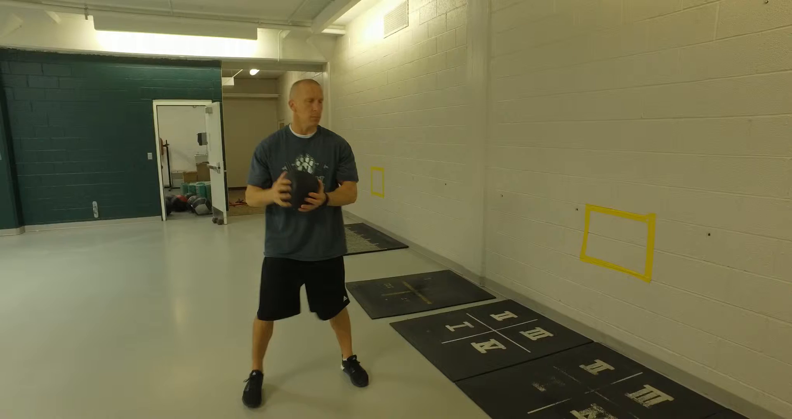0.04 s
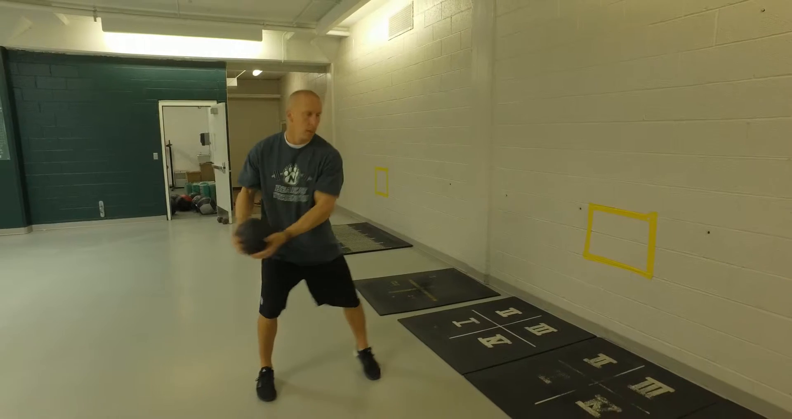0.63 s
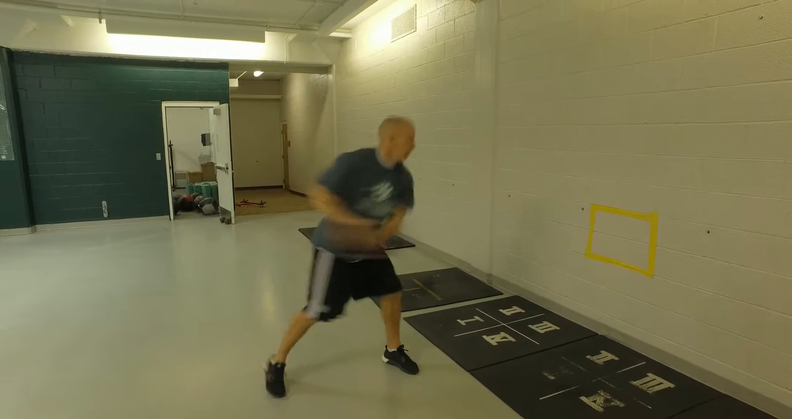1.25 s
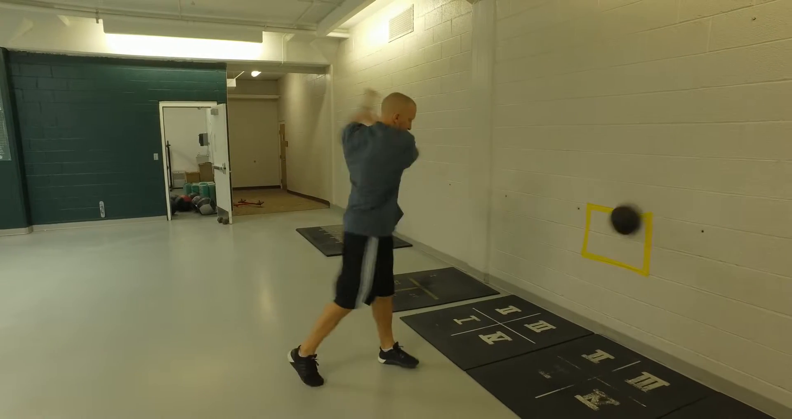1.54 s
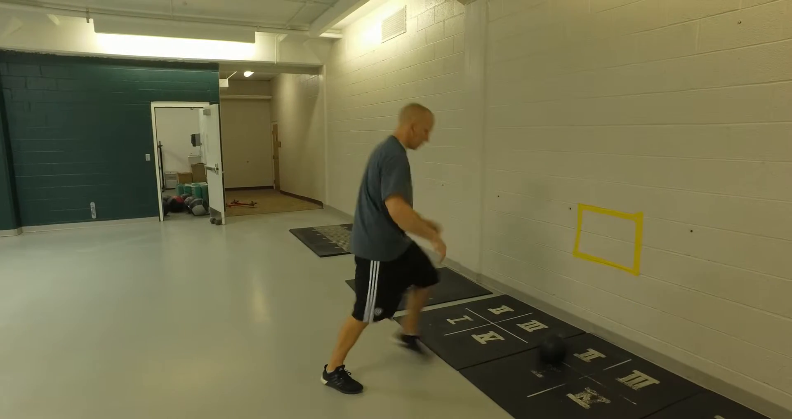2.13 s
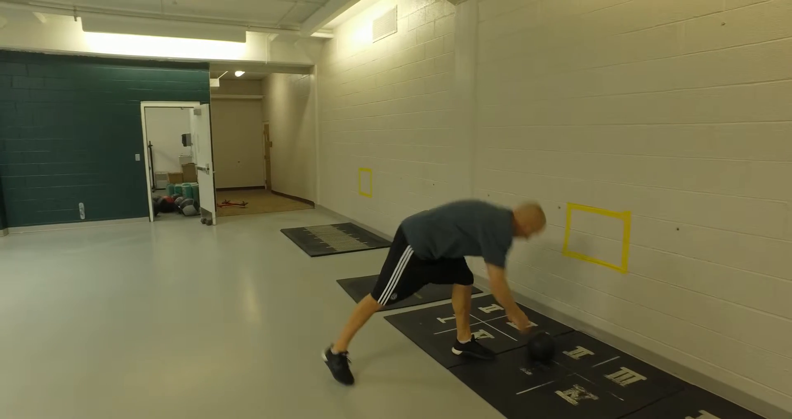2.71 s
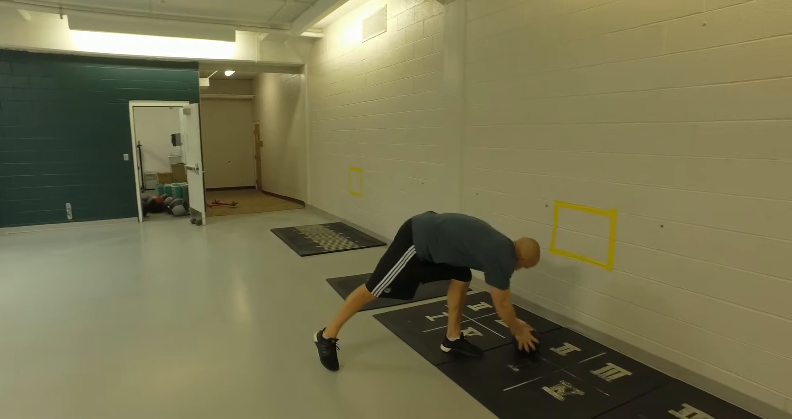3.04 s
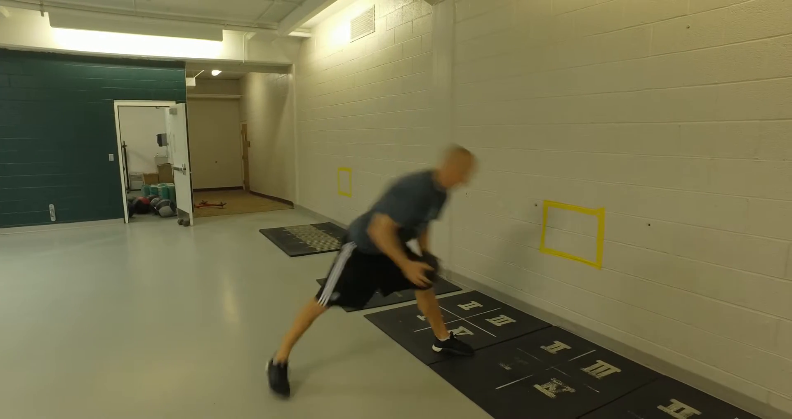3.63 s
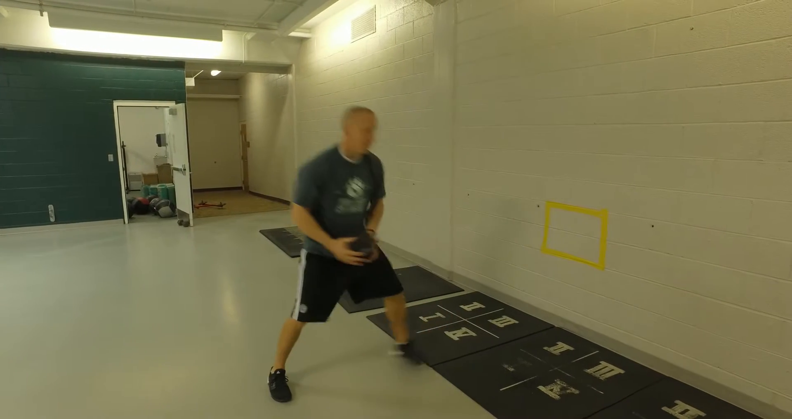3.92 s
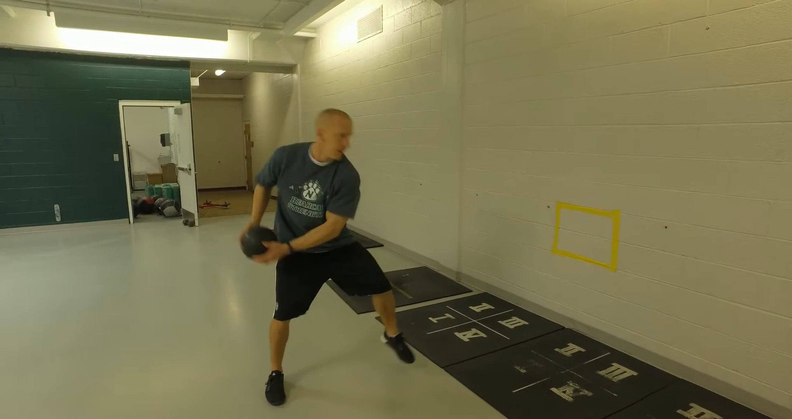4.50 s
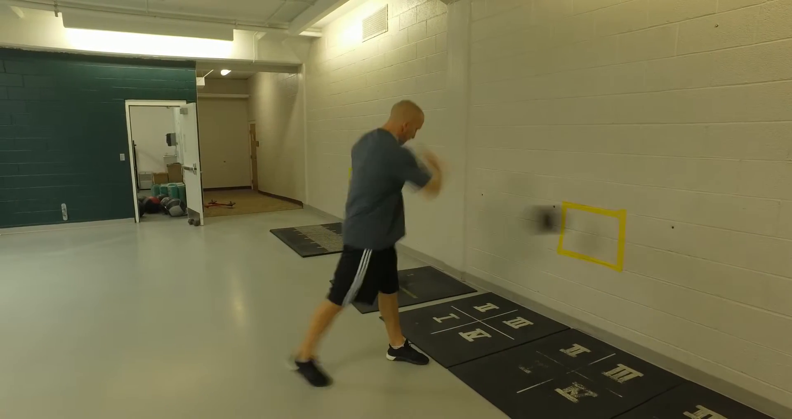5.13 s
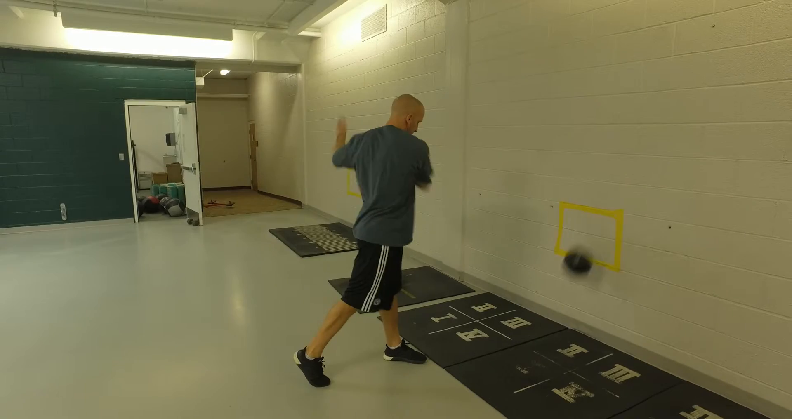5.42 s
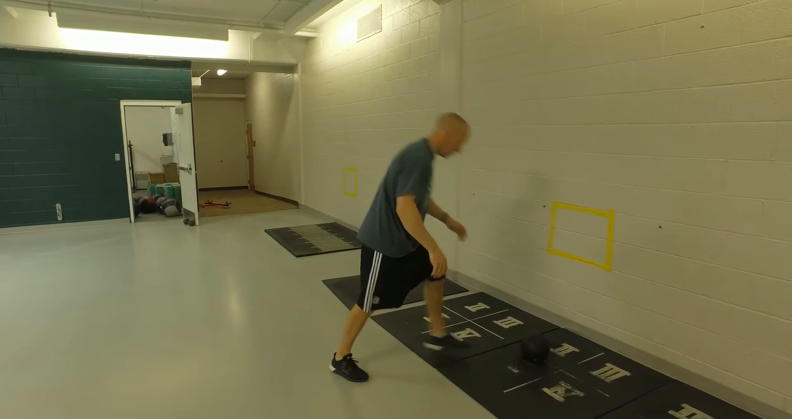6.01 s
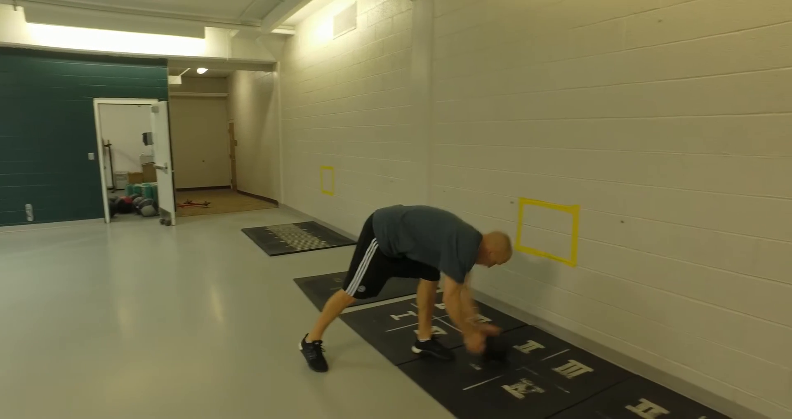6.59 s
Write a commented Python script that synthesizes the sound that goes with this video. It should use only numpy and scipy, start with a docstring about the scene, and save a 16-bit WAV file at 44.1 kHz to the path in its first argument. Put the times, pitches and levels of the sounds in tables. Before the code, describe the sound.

The microphone comes on with a tick, a dull bump and a very short, loud spit of static just before 0.2 seconds. Ventilation then hisses and hums steadily in a long, hard training room. At about 1.4 seconds a quick swish of arms leads into a medicine ball hitting a block wall: a slap and a heavy thud that crackles as it overloads the microphone and booms on for seconds. The ball knocks onto a floor mat at 1.8 seconds. Soft, low footfalls come near 2.2, 2.7 and 3.7 seconds, and rubber soles step and drag briefly around 4.2 to 4.4 seconds. Another swish brings a second, slightly softer wall slap and deep thud at 5.1 seconds, followed by a firm drop onto the mat at 5.5. Under the fading boom come a step at 6 seconds and a soft thump with a light slap near 6.6.

```python
"""A long, hard training room: a medicine ball is thrown twice at a block wall and drops onto a floor mat.
Each throw is a swish of the arms, a slap of the ball's skin and a heavy thud that booms on in the room.
Shoes shift on the floor, and the ventilation hisses and hums steadily.
The microphone comes on with a bump and a spit of static, and the hardest blow overloads it."""
import sys
import numpy as np
from scipy import signal
from scipy.fft import rfft, irfft, next_fast_len
from scipy.io import wavfile

SR = 44100
rng = np.random.default_rng(int(sys.argv[2]) if len(sys.argv) > 2 else 0)


def digitize_waveform(pressure):
    """Quantize a signal to 16-bit integers and store it at the path in sys.argv[1].

    Rows of a 2-D input are taken as channels; values are limited to [-1, 1].
    """
    field = np.atleast_2d(pressure).T
    bounded = np.clip(field, -1, 1)
    quanta = np.round(bounded * 32767).astype(np.int16)
    wavfile.write(sys.argv[1], SR, quanta)


N = 297675
TIME = np.arange(N) / SR
OPEN_S = .1699  # the microphone starts to pass the room's sound

# standing waves that every thud sets going: (frequency [Hz], level [dB], t60 [s])
ROOM_MODES = [(21.4, -8.5, 2.05), (35.96, -10.5, 2.6), (74.5, -18, 4.2), (123.7, -26, 1.9),
              (132.5, -10, 3.5), (160.5, -20.5, 3.9), (174.6, -20.5, 6.4), (196.5, -20.5, 4.3),
              (259.7, -19, 2.3), (477, -38, 0.44)]


def wall_thuds():
    """The ball flattens and rings dead; the wall drives the room's boom and its standing waves."""
    # ball on wall: (time [s], level [dB], rumble boost [dB], boom boost [dB])
    hits = [(1.4032, -1.5, -2, 2), (5.106, -5, 1.5, -2.5)]
    # the ball's dead ring: (frequency [Hz], level [dB], t60 [s])
    ball_modes = [(68, -46, .09), (171, 0, 0.085), (315.5, -2, 0.12), (538, -1.5, 0.033)]
    # colour of the thud: (frequency [Hz], level [dB])
    colour = [(18, 1.5), (30, 2), (44, -8.5), (62, -2.5), (88, -5.5), (135, -0.5), (200, -9.5), (280, -14),
              (420, -22), (650, -26.5), (1000, -42.5), (1400, -72.5), (3000, -55)]
    out, ball, standing = np.zeros(N), ring(ball_modes), ring(ROOM_MODES)
    for s, thud_db, _, boom_db in hits:
        out += from_db(thud_db) * later(s, from_db(boom_db) * ball + from_db(boom_db / 2) * standing)
    for hz, band in noise_bands(colour):
        envelope = in_room(hz, near_db=-1, near_t60=0.36, rise=0.012)
        deep = 1 / (1 + (hz / 70) ** 2)  # the rumble sits below 70 Hz
        hollow = np.exp(-(np.log2(hz / 170) / 0.88) ** 2)  # the boom centres on 170 Hz
        for s, thud_db, rumble_db, boom_db in hits:
            band_db = thud_db + rumble_db * deep + boom_db * hollow - 4.5
            out += from_db(band_db) * band * later(s, envelope)
    return out


def floor_thuds():
    """Ball and shoes land soft and heavy: a short punch, then the room's boom with less rumble."""
    # landings: (time [s], level [dB], punch re level [dB])
    landings = [(1.834, -16.5, -17.5), (2.21, -26, -13), (2.701, -27.5, 4), (3.66, -29, -11),
                (4.158, -35, 5), (4.328, -27.5, -5), (5.524, -13, 5.5), (6.02, -29.5, 7),
                (6.582, -28.5, -3)]
    # dead knock of a weight on the floor: (frequency [Hz], level [dB], t60 [s])
    floor_modes = [(121.7, 3, 0.2), (205, 5, 0.12), (299, -8, 0.045), (393, -4.5, 0.096), (577, -24, 0.094)]
    # colour of the thud: (frequency [Hz], level [dB])
    colour = [(18, -41), (50, -8), (85, -2), (135, -3.5), (200, -8), (330, -10), (550, -15.5), (900, -32),
              (1500, -53), (3000, -70)]
    out, punch, standing = np.zeros(N), ring(floor_modes), ring(ROOM_MODES)
    for s, thud_db, punch_db in landings:
        out += from_db(thud_db) * later(s, from_db(punch_db) * punch + from_db(2.5) * standing)
    for hz, band in noise_bands(colour, count=9):
        envelope = in_room(hz, near_db=3.5, near_t60=0.13, rise=0.024)
        out += band * sum(from_db(thud_db - 7) * later(s, envelope) for s, thud_db, _ in landings)
    return out


def slaps():
    """The ball's skin cracks on wall, mat and hands, then rings; the room answers with a bright tail."""
    # slaps: (time [s], level [dB], tilt [dB/octave], crack re level [dB], skin ring re level [dB])
    contacts = [(1.233, -61, 6.5, 12, -20), (1.4053, -27, -1, 10, -8.5), (1.4164, -38, 5.5, 6, -19),
                (1.814, -35.5, -1, 20, -11.5), (3.4145, -67, 2, 12, -12), (5.1061, -32, -2.5, 21.5, -6),
                (5.12, -38.5, 6, 0, 1), (5.18, -47, 1, 21, -24), (5.503, -41.5, 1, 22.5, -8),
                (6.5899, -47.5, -3, 6, -9)]
    # colour of the slap: (frequency [Hz], level [dB])
    colour = [(200, 10.5), (600, 1.5), (1050, 7.5), (1450, -6.5), (2350, -1), (3200, -9.5), (4000, -16),
              (5100, -20), (6000, -5), (7800, -6), (9500, -12), (11000, -4.5), (15000, -17)]
    # the taut skin's resonances: (frequency [Hz], level [dB])
    skin_colour = [(1500, -51), (2100, -8), (2400, -8), (2900, -21), (3600, -26), (5300, -28), (6050, -20),
                   (6900, -43), (8500, -50)]
    out, crack = np.zeros(N), dying(0.041, rise=0.0012)
    for hz, band in noise_bands(colour, count=10):
        tail = in_room(hz, near_db=-0.5, near_t60=0.18, rise=0.022)
        octaves = np.log2(max(hz, 500) / 3000)  # the tilt pivots on 3 kHz
        for s, db, tilt, crack_db, _ in contacts:
            out += from_db(db + tilt * octaves) * band * later(s, from_db(crack_db) * crack + tail)
    skin = noise(skin_colour)
    skin_tail = in_room(2070, near_db=19.0, near_t60=0.038, rise=0.043)
    for s, db, _, _, ring_db in contacts:
        out += from_db(db + ring_db) * skin * later(s, skin_tail)
    return out


def swishes():
    """Cloth and air rush past as the arms throw, just before the ball lands."""
    # throws: (time [s], half width [s], level [dB])
    throws = [(1.35, 0.1, -31), (5.06, 0.14, -32.5)]
    # colour of the swish: (frequency [Hz], level [dB])
    colour = [(25, 2), (70, 3), (150, 7), (400, -8), (900, -5), (1500, -20), (2300, -25), (4000, -45),
              (12000, -70)]
    return noise(colour) * swells(throws)


def shuffles():
    """A rubber sole drags briefly over the floor as the feet are set."""
    # slides and pivots: (time [s], half width [s], level [dB])
    slides = [(1.25, 0.059, -38), (4.19, 0.096, -28.5), (4.37, 0.11, -29.5)]
    # colour of the sliding sole: (frequency [Hz], level [dB])
    colour = [(35, -12), (80, 3), (150, -12), (260, -8), (370, -2), (520, -9), (900, -13), (1400, -30),
              (3000, -40), (12000, -75)]
    return noise(colour) * swells(slides)


def switch_on():
    """The microphone comes on with a tick, a short dull bump and a loud spit of static."""
    # colour of the bump: (frequency [Hz], level [dB])
    bump_colour = [(30, 11), (150, -0.5), (260, -2), (430, -6), (620, -17), (900, -21), (1400, -14),
                   (2200, -22), (3200, -34), (4800, -33), (7000, -30), (12000, -53)]
    # the bump's ring: (frequency [Hz], level [dB], t60 [s])
    bump_modes = [(130, -13, 0.014), (445, -14.5, 0.17), (802, -24, 0.54)]
    # colour of the static: (frequency [Hz], level [dB])
    static_colour = [(100, -3), (850, -11), (1050, 10.5), (1300, 9), (1800, -26), (2200, 8), (2700, -24),
                     (3400, -4.5), (6500, -8), (8200, 6.5), (9300, -14), (10100, 9), (11000, -8),
                     (15000, -6)]
    tick_s, bump_s, static_s = .1272, .1335, .1667
    tick = from_db(-11.5) * later(tick_s, dying(0.005, rise=.00005))
    bump = from_db(-15) * noise(bump_colour) * later(bump_s, dying(0.48, rise=0.00087))
    bump += later(bump_s, ring(bump_modes))
    static = from_db(-2) * noise(static_colour) * (TIME > static_s)
    return tick + (bump + static) * (TIME < OPEN_S)


def overload(x):
    """Peaks clip flat; two crests placed on the hardest blow flip to the opposite rail and crack."""
    # cracks: (time [s], flip length [s], crest height [x full scale])
    cracks = [(1.4095, .00045, -2), (1.4297, .00025, 2)]
    polarity = np.ones(N)
    for s, length, peak in cracks:
        crest = np.exp(-((TIME - s) / 0.0016) ** 2)
        x = (1 - crest) * x + crest * peak
        polarity[(TIME >= s) & (TIME < s + length)] = -1
    return np.clip(x, -1, 1) * polarity


def ventilation():
    """Moving air lays a steady bed of rush and hiss over a three-tone hum."""
    # low rush of air: (frequency [Hz], level [dB])
    rush = [(20, -16), (50, -2), (100, -5), (200, 0.5), (380, -2.5), (560, -4.5), (750, -11.5),
            (1050, -12.5), (1400, -27), (2100, -18), (2600, -24), (3200, -52), (6000, -36), (15000, -42)]
    # mid hiss: (frequency [Hz], level [dB])
    mid_hiss = [(1200, -30), (1500, -7), (1900, -2), (2500, -4), (3200, -13.5), (5000, -33)]
    # high hiss: (frequency [Hz], level [dB])
    high_hiss = [(2500, -43), (3200, -8), (3800, 10), (4300, 9), (5100, -12), (5900, 3), (7000, -32),
                 (15000, -21)]
    # hum: (frequency [Hz], level [dB])
    tones = [(118.4, -38.5), (209.9, -45), (360.7, -45)]
    flow = from_db(-34.5) * noise(rush) + from_db(-51) * noise(mid_hiss)
    flow += from_db(-53) * noise(high_hiss)
    hum = sum(from_db(db) * np.sin(2 * np.pi * (hz * TIME + rng.random())) for hz, db in tones)
    return flow + np.sqrt(2) * hum


def mic_noise():
    """The microphone's own hiss creeps up after switch-on, then holds."""
    # colour of the hiss: (frequency [Hz], level [dB])
    colour = [(2000, 6.5), (4200, 1), (5100, -62), (6000, 3.5), (8000, 3.5), (10500, 3), (12200, 0.5),
              (14500, 3.5)]
    creep_db, settle_s = 5, 1.5
    unsettled = np.maximum(1 - TIME / settle_s, 0)
    return from_db(-49 - creep_db * unsettled) * noise(colour)


def in_room(hz, near_db, near_t60, rise):
    """A blow's envelope in one band: strong, brief near reflections, then the long diffuse tail."""
    # the room's decay: (frequency [Hz], t60 [s])
    room_t60 = [(25, 5.4), (70, 3.45), (140, 3.83), (300, 3.75), (600, 2.38), (1200, 3.3), (2400, 0.75),
                (6500, 0.81), (13000, 0.25)]
    return from_db(near_db) * dying(near_t60) + dying(at_hz(room_t60, hz), rise)


def dying(t60, rise=0.00092):
    """Envelope that opens with time constant rise [s] and falls 60 dB in t60 [s]."""
    age = TIME[:int(1.5 * t60 * SR)]
    attack = -np.expm1(-age / rise)
    decay = np.exp(-np.log(1000) * age / t60)
    return np.pad(attack * decay, (0, N - len(age)))


def swells(events):
    """Envelope with one bell-shaped swell for each event."""
    return sum(from_db(db) * np.exp(-((TIME - s) / width) ** 2) for s, width, db in events)


def ring(modes):
    """Damped modes after one blow."""
    return sum(from_db(db) * dying(t60) * np.sin(2 * np.pi * hz * TIME) for hz, db, t60 in modes)


def noise_spectrum(colour):
    """Random spectrum shaped by a colour, with nothing below hearing; returns (Hz, bins)."""
    size = next_fast_len(N)
    hz = np.arange(size // 2 + 1) * SR / size
    gain = from_db(at_hz(colour, hz)) * (hz > 16)
    gain /= np.sqrt(np.mean(gain ** 2) + 1e-20)  # a colour sets tone only, not loudness
    return hz, rfft(rng.standard_normal(size)) * gain


def noise(colour):
    """Steady coloured noise of unit rms."""
    return irfft(noise_spectrum(colour)[1], next_fast_len(N))[:N]


def noise_bands(colour, count=14):
    """Coloured noise split into log-spaced (centre Hz, band) pairs."""
    hz, bins = noise_spectrum(colour)
    edges = np.geomspace(16, 18000, count + 1)
    return [(np.sqrt(lo * hi), irfft(bins * (hz >= lo) * (hz < hi), next_fast_len(N))[:N])
            for lo, hi in zip(edges, edges[1:])]


def at_hz(points, hz):
    """Read a table on a log-frequency axis."""
    knots, values = np.transpose(points)
    return np.interp(np.log(np.maximum(hz, 1)), np.log(knots), values)


def later(s, sound):
    """Delay a sound by s seconds."""
    start = int(s * SR)
    return np.concatenate([np.zeros(start), sound[:N - start]])


def from_db(db):
    """Decibels to gain."""
    return 10 ** (np.asarray(db) / 20)


def scene():
    """The mono mix; near echoes give everything but the thuds a hollow ripple."""
    # early echoes off side wall and ceiling: (delay [s], level [dB])
    near_echoes = [(0.0187, -17.5), (0.0293, -15)]
    bright = slaps() + swishes() + shuffles() + ventilation() + mic_noise()
    echoes = sum(from_db(db) * later(delay, bright) for delay, db in near_echoes)
    return (wall_thuds() + floor_thuds() + from_db(-1) * (bright + echoes))[None]


def record(dry):
    """The microphone comes on, overloads on the peaks and loses the very top."""
    cutoff_hz = 15700
    clipped = overload(dry * (TIME > OPEN_S) + switch_on())
    return signal.sosfilt(signal.cheby2(20, 60, cutoff_hz, fs=SR, output="sos"), clipped)


dry = scene()
out = record(dry)
digitize_waveform(out)
```